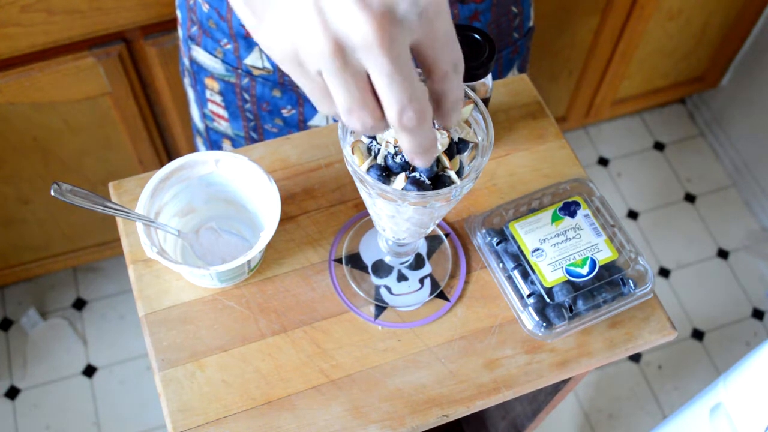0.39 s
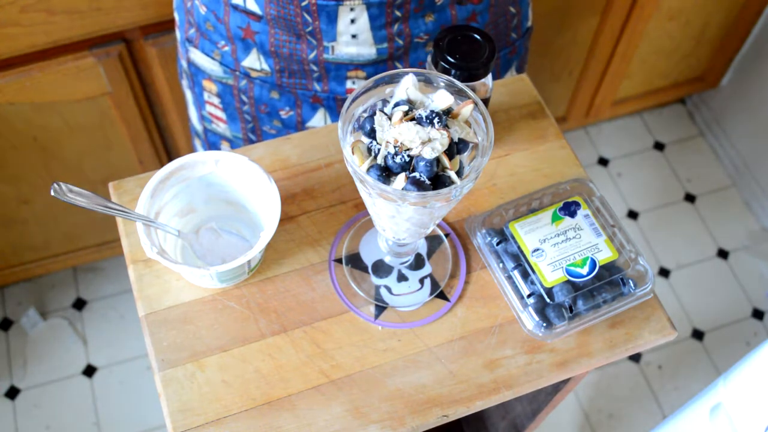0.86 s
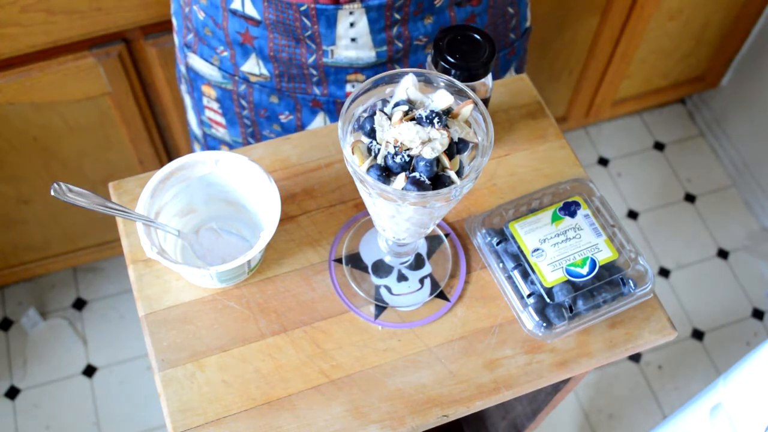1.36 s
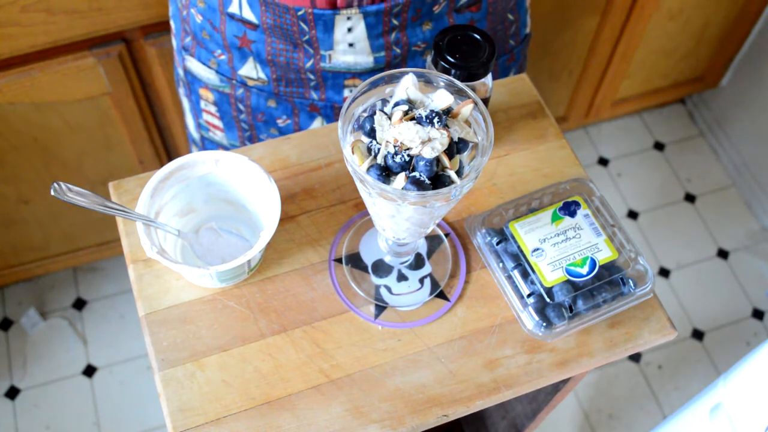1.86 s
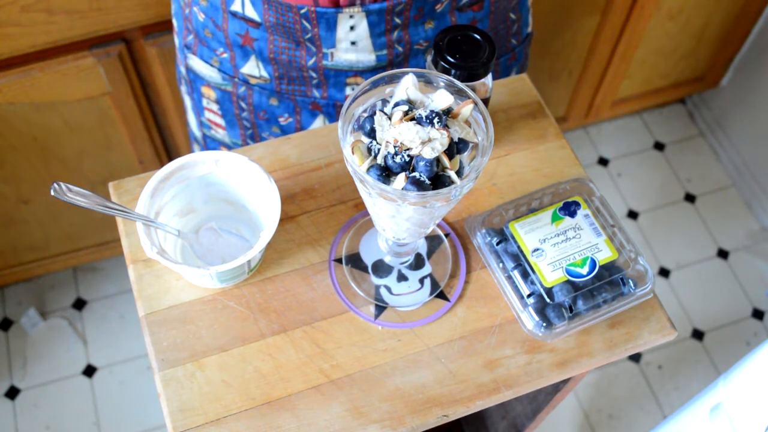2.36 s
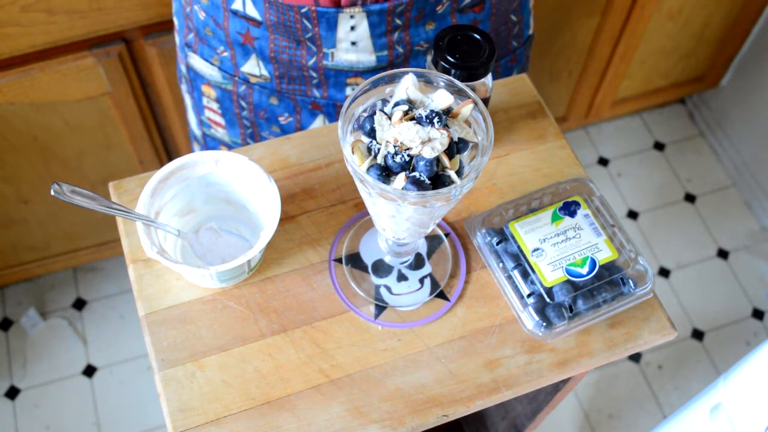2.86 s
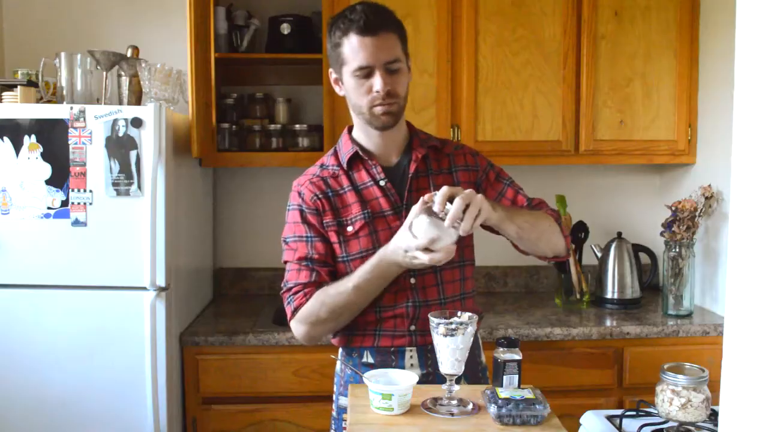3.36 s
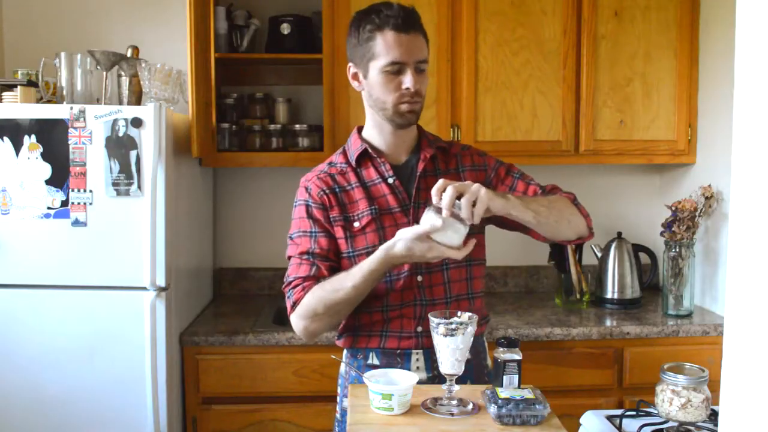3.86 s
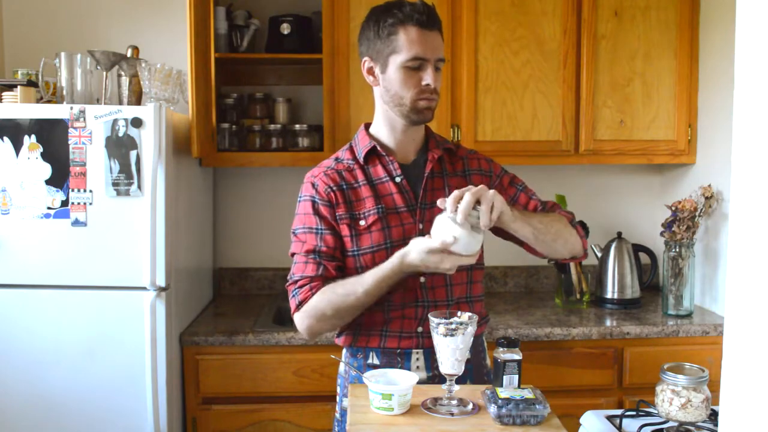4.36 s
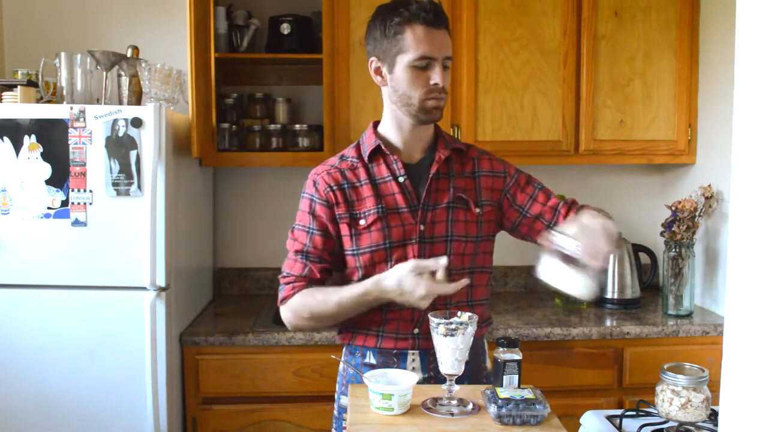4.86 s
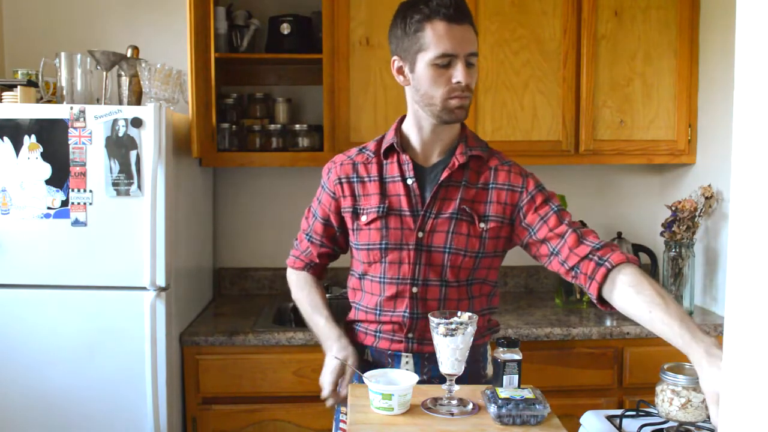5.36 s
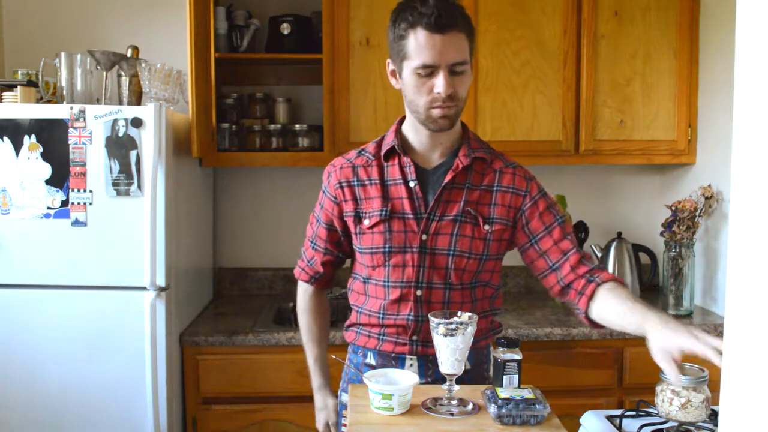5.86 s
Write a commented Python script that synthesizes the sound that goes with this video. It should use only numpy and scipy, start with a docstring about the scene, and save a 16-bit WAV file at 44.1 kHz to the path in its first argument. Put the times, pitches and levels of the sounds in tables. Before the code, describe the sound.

Small ceramic pot handled in a lively kitchen; clicks, knocks, one very loud lid clack, gritty rubbing, a hand brush, and a clank onto metal.

```python
"""Small ceramic pot handled in a kitchen.

A cap snaps, then clicks and scrapes; a glass clinks, the lid knocks, grinds and taps on the pot,
a hand brushes over it with a squeak, and it is set down on a metal top.
Blows are noise bursts plus decaying modes; rubbing is shaped noise and soft tones.
Hard walls answer, a refrigerator hums; the loudest blows clip the recorder.
"""
import sys
import numpy as np
from scipy import signal
from scipy.fft import rfft, irfft, next_fast_len
from scipy.io import wavfile
from scipy.ndimage import map_coordinates

SR = 44100
rng = np.random.default_rng(int(sys.argv[2]) if len(sys.argv) > 2 else 0)


def boost(x):
    """Linear amplitude factor 10**(x/20) for a level x in decibels (scalar or array-like)."""
    u = np.asarray(x, float) / 20
    return 10 ** u


def int16_out(signal):
    """Quantize to a 16-bit WAV file."""
    q = np.round(np.clip(np.atleast_2d(signal).T, -1, 1) * 32767)
    wavfile.write(sys.argv[1], SR, q.astype(np.int16))


N = 263529  # samples

# cap snap, then small clicks and a short scrape: start_s, level_db, centre_hz, thud_db, treble_db
# (thud and treble relative to the centre band, here and below)
CAP_CONTACTS = [(1.5918, -13.5, 1300, 0, -16), (1.5944, 1.5, 3600, -13, -12),
                (1.657, -29.5, 3600, -20, -12), (1.7094, -32.5, 5000, -12, -31), (1.946, -20, 2700, -6, -2),
                (1.956, -23.5, 1700, 0, -10), (1.9765, -26, 3600, -4.5, -17)]
# glass clink: start_s, level_db, centre_hz, thud_db, treble_db
GLASS_HITS = [(1.7607, -13.5, 3520, -3.5, -11.5)]
# knocks: start_s, level_db, centre_hz, thud_db, treble_db
BOARD_HITS = [(1.977, -16, 300, -6, -33), (2.011, -27.5, 385, -14, -24), (2.051, -18, 1050, -17, -26),
              (2.182, -23.5, 1150, 0, -28), (2.318, -23, 860, 3, -12), (2.465, -39, 280, 0, -30),
              (2.605, -32, 280, 0, -30), (2.669, -30, 900, 3, -26), (2.838, -20, 1300, -13.5, -20),
              (2.9365, -5.5, 400, -8, -19)]
# lid on pot: start_s, level_db, centre_hz, thud_db, treble_db, ring_db (how freely the pot rings)
LID_HITS = [(2.305, -28, 3000, -19, -2, -9), (2.533, -37, 1900, 7, -10, -10),
            (2.599, -34, 2030, 8, -22, -13), (2.638, -38, 6100, 3, -14, -2),
            (2.7245, -23.5, 3600, 5, -12, -10), (2.755, -33, 2200, -5, -15, -10),
            (2.808, -23, 2800, -12, -5, -16), (2.838, -31, 2000, 6, -11, -8.5),
            (2.939, -1.5, 1980, -20, -5, -11.5), (3.024, -25.5, 2020, -23, -1.5, -6),
            (3.19, -33.5, 2500, -7, -13.5, -8.5), (3.5245, -19, 2420, -13, -2.5, .8),
            (3.8, -33, 2350, -25, -12, -8), (4.122, -53.5, 4500, -14, -1.2, -3)]
# grit catching under the lid: start_s, level_db, centre_hz, thud_db, treble_db
GRIT_CATCHES = [(2.638, -40, 2400, -40, -30), (3.717, -44, 5500, -40, -30), (3.745, -37, 2300, -40, -30),
                (3.772, -42, 5000, -40, -20), (3.795, -43, 3500, -40, -30), (3.821, -35, 4950, -40, -25),
                (3.862, -42, 2400, -40, -30)]
# pot on metal top: start_s, level_db, centre_hz, thud_db, treble_db
METAL_HITS = [(5.379, -14, 1950, -8, -11), (5.398, -20, 800, -18.5, -26), (5.49, -25, 1000, -7, -41),
              (5.555, -33, 196, 3, -35)]
# modes of each object: mode_hz, level_db, t60_s
CAP_MODES = [(644, 1, 0.035), (1000, -2.2, 0.022), (2010, -5, 0.015), (2900, -3, 0.008), (3200, 1.5, 0.01),
             (3370, -5, .015), (3780, -8, 0.01), (4480, 1.5, 0.01), (4650, 1.5, 0.014), (6560, -3, .008),
             (8560, -8, 0.0053)]
GLASS_MODES = [(494, 3.5, 0.063), (605, 3, 0.041), (2320, 0.5, 0.085), (3250, -2, .03), (3600, -2, 0.036),
               (4312, 0, 0.075), (5184, -2, .08), (5805, 1.5, 0.075), (6455, 0, .07), (8619, -0.7, 0.11),
               (11140, -6.5, 0.18), (11930, -1.5, 0.066), (12960, 0, .08)]
BOARD_MODES = [(248, -6.5, 0.02), (268.5, 2, .08), (398.6, -3, .06), (463, .5, .07), (900, -5, 0.035),
               (1190, -2, .015), (1460, -11.5, .02)]
POT_MODES = [(269.8, 1, 0.13), (390.6, -8, 0.068), (456, -12, 0.23), (558, -8, 0.13), (1150, -11, 0.024),
             (1506, -10.5, 0.07), (1865, -12, 0.033), (1985, -1.5, 0.075), (2015, -5, 0.11),
             (2240, -5.5, 0.07), (2400, -10, .12), (3200, -18, .03), (3500, -19.5, .1), (3915, -7, 0.06),
             (4080, -14, .1), (4650, -14.5, .05), (5000, -14, .1), (6060, -16.5, .04), (6330, -16, 0.055)]
METAL_MODES = [(387.8, -6, 0.3), (790, .5, 0.14), (581, -8, .2), (915, -9, .15), (1000, -8, .18),
               (1064, -8.5, .18), (1168, -5, .15), (1335, -5, .2), (1486, -6, 0.2), (1658, -6, .12),
               (1830, -3, .12), (1925, 2.5, 0.1), (1970, 5, 0.14), (2126, 3, 0.09), (2557, -6, 0.12),
               (2891, -6.5, 0.26), (3900, -8, 0.13), (4300, -6, 0.18), (4420, -2, .07), (5530, -7, .2),
               (5750, -4, .08), (6476, 8, .04), (7430, 2, 0.16), (8160, -11, .08), (9600, 4, 0.06),
               (11970, 3, .04)]
# rubbing on the pot, lid scrapes then squeak under the hand:
# peak_s, ring_db, rise_s, hiss_db, rumble_db (last two over the ring)
POT_RUBS = [(2.322, -42.5, .022, 1.5, -1.5), (2.542, -51, .009, -2, -3), (2.63, -53, .08, -6, -3),
            (2.725, -48, .03, -4.5, -2), (2.87, -46.5, .13, -13, 5), (3.17, -51, .08, 1.2, -4),
            (3.28, -49, .045, 1.5, -3.5), (3.516, -44, .08, -5, 1.2), (3.535, -35, .01, -8.5, 0),
            (3.814, -44, .13, -5, -6), (4.285, -46, .02, -1.2, -12), (4.42, -53, .1, 3, -6)]
# hiss spectrum of the rubbing: freq_hz, density_db_per_hz
GRIT_SPECTRUM = [(1760, -33), (3000, -12.5), (3520, -3), (3820, -6.5), (5030, 0.5), (9100, -12.5),
                 (15600, -29.5)]
# hand over the glaze, one stroke: peak_s, level_db, rise_s, hold_s, fade_db_per_s
HAND_STROKE = (4.32, -27.5, .057, .032, 215)
# skin hiss spectrum: freq_hz, density_db_per_hz
SKIN_SPECTRUM = [(180, -61), (300, -26), (372, -12), (446, -1), (621, -29), (1140, -22), (2180, -6.5),
                 (4290, -5.5), (6070, 0.5), (11200, -8), (15600, -18)]
# faint rustles: peak_s, level_db, rise_s, hold_s, fade_db_per_s
RUSTLES = [(0.01, -64, .01, .45, 60), (1.138, -64, .06, .03, 200), (1.29, -70, .05, .03, 200),
           (1.402, -67, .04, .01, 120)]
# rustle spectrum: freq_hz, density_db_per_hz
RUSTLE_SPECTRUM = [(900, -30), (1400, -2), (2000, -8.5), (3000, -1), (4200, -8.5), (7000, -13),
                   (12000, -30.5)]
# soft gliding tones: start_s, length_s, from_hz, to_hz, level_db
GLIDES = [(3.15, .34, 470, 515, -51), (4.265, .045, 2400, 2350, -42), (4.385, .08, 1880, 1950, -47.5)]
# wall reverberation: freq_hz, t60_s
WALL_DECAY = [(200, 0.39), (1000, 0.53), (3000, 0.43), (8000, 0.34), (15000, .22)]
# steady motor tones: pitch_hz, level_db, waver_db
HUM_TONES = [(59.2, -39.5, -1), (121, -55, 2.5), (272.5, -70.5, 0), (340, -67, 2), (800, -68.5, 4.2)]
# low tone that swells and wanders: time_s, level_db, pitch_hz
LOW_TONE = [(0.0, -62, 106.9), (0.43, -41, 95.6), (0.65, -51, 94.8), (1.01, -41, 94.8), (1.11, -49, 95.7),
            (1.91, -41, 98.9), (2.1, -46, 97.5), (2.34, -39, 97.4), (3.48, -45, 98.0), (3.65, -59, 94.8),
            (3.99, -47, 104.1), (4.33, -49, 98.7), (4.56, -58, 106.9), (4.68, -46, 105.6),
            (5.19, -50, 105.9), (5.39, -46, 96.6), (5.71, -48, 95.5), (5.98, -52, 106.9)]
# background levels: time_s, drone_db, hiss_db
BACKGROUND = [(0.0, -39.5, -58.5), (0.35, -39.5, -60.5), (0.8, -45, -64.5), (1.3, -46.5, -62),
              (5.3, -45.5, -62.5), (5.97, -42.5, -59.5)]
# background spectra: freq_hz, density_db_per_hz
DRONE_SPECTRUM = [(12, -43.5), (20, -2), (32, -15), (43, -8), (65, -14), (104, -16.5), (146, -22.5),
                  (270, -21.5), (312, -29), (416, -28), (498, -33), (783, -35.5), (1500, -44),
                  (1950, -76.5), (3300, -120)]
HISS_SPECTRUM = [(400, -30), (800, -10), (1300, -18.5), (2000, -11), (3200, -16.5), (6000, -19),
                 (10000, -22), (15600, -25)]


def unit(x):
    """x at rms 1."""
    return x / np.sqrt(np.mean(x ** 2) + 1e-20)


def along(points, hz):
    """Interpolates (freq_hz, value) points on a log axis."""
    f, v = np.transpose(points)
    return np.interp(np.log(hz + 1), np.log(f + 1), v)


def curves(rows):
    """One value per sample for each column after the time."""
    time_s, *columns = np.transpose(rows)
    return [np.interp(np.arange(N) / SR, time_s, column) for column in columns]


def wobble(rate_hz):
    """Smooth random curve with rate_hz knots a second."""
    knots = rng.standard_normal(int(N * rate_hz / SR) + 4)
    return map_coordinates(knots, [np.arange(N) * rate_hz / SR])


def filtered(x, response):
    """x through a (complex) response of frequency."""
    size = next_fast_len(len(x) + 8192)
    return irfft(rfft(x, size) * response(np.fft.rfftfreq(size, 1 / SR)), size)[:len(x)]


def noise(spectrum, grain_db=0):
    """Coloured noise of rms 1; grain_db of fast level wobble makes it scratchy."""
    grainy = rng.standard_normal(N) * boost(grain_db * wobble(300))
    return unit(filtered(grainy, lambda hz: boost(along(spectrum, hz))))


def swell(peak_s, level_db, rise_s, hold_s, fade_db_per_s):
    """Envelope of a stroke: grows, holds, fades."""
    late_s = np.arange(N) / SR - peak_s
    growth = np.clip(1 + late_s / rise_s, 0, 1) ** 1.5
    return growth * boost(level_db - fade_db_per_s * np.clip(late_s - hold_s, 0, None))


def bump(hz, centre_hz, width_octaves):
    """Gaussian band on an octave axis."""
    return np.exp(-(np.log2((hz + 1) / centre_hz) / width_octaves) ** 2 / 2)


def room(x):
    """Wall answer: fresh noise tail in which each frequency dies at its own speed."""
    hz, t, z = signal.stft(rng.standard_normal(SR * 3 // 4), SR, nperseg=256)
    decay = boost(-60 * t / along(WALL_DECAY, hz)[:, None])
    tail = signal.istft(z * decay, SR, nperseg=256)[1]
    tail *= 1 - np.exp(-np.arange(len(tail)) / SR / 0.0013)  # echoes thicken over the first moments
    return signal.fftconvolve(x, tail / np.linalg.norm(tail))


def strikes(contacts, modes, ring_db, crack_db, treble_hz, crack_fade_s, rise_s, octaves, wet_db, flutter_db):
    """Contacts: noise burst plus object modes, both coloured by how it landed, then the room."""
    out, t = np.zeros(N + 2 * SR), np.arange(SR // 3) / SR
    for start_s, level_db, centre_hz, thud_db, treble_db, *own_ring_db in contacts:
        def colour(hz):
            bands = bump(hz, centre_hz, octaves) + boost(thud_db) * bump(hz, 380, 1.0)
            bands = bands + boost(treble_db) * bump(hz, treble_hz, 1.0)
            return bands / (1 + (hz / 14800) ** 6)

        fade = boost(-60 * t / crack_fade_s)
        burst = rfft(rng.standard_normal(len(t)) * fade)
        even_burst = irfft(burst / np.abs(burst) ** .7, len(t))  # flattens chance spectral peaks
        crack = filtered(even_burst, colour) * np.sqrt(fade)
        crack *= np.linalg.norm(fade) / np.linalg.norm(crack)

        # loose contact makes each mode flutter
        knots = rng.standard_normal((len(modes), 64))
        places = np.mgrid[:len(modes), :len(t)] * [[[1]], [[120 / SR]]]  # 120 knots a second
        flutter = map_coordinates(knots, places, order=1)
        ring = np.zeros(len(t))
        for (mode_hz, mode_db, t60_s), shake in zip(modes, flutter):
            # modes nearest the centre are hit hardest
            drive = colour(mode_hz) * (1 + boost(1.5) * bump(mode_hz, centre_hz, 0.05))
            shake_db = flutter_db * shake * np.tanh(t / .02)
            ring += drive * boost(mode_db + shake_db - 60 * t / t60_s) * np.sin(2 * np.pi * mode_hz * t)

        blow = boost(crack_db) * crack + boost(ring_db + sum(own_ring_db)) * ring
        blow *= boost(level_db) * (1 - np.exp(-t / rise_s))
        answer = boost(wet_db) * room(blow)
        first = round(start_s * SR)
        out[first:][:len(t)] += blow
        out[first:][:len(answer)] += answer
    return out[:N]


def cap_snap():
    """Cap snaps, then small clicks and a short scrape: bursts over very short modes."""
    return strikes(CAP_CONTACTS, CAP_MODES, ring_db=-10.5, crack_db=-1.5, treble_hz=11500, crack_fade_s=0.012,
                   rise_s=0.00029, octaves=0.5, wet_db=0.3, flutter_db=0.5)


def lid_taps():
    """Lid taps the pot, whose modes ring as freely as each contact lets them."""
    return strikes(LID_HITS, POT_MODES, ring_db=0, crack_db=-.3, treble_hz=6500, crack_fade_s=0.016,
                   rise_s=0.0004, octaves=0.8, wet_db=-1.1, flutter_db=1.0)


def knocks():
    """Knocks: dull bursts over short, low board modes."""
    return strikes(BOARD_HITS, BOARD_MODES, ring_db=-11, crack_db=-.5, treble_hz=6000, crack_fade_s=0.016,
                   rise_s=0.0011, octaves=0.5, wet_db=-5, flutter_db=3.3)


def glass_clink():
    """Glass clinks: wide-band burst over high modes."""
    return strikes(GLASS_HITS, GLASS_MODES, ring_db=-16, crack_db=.5, treble_hz=9000, crack_fade_s=0.013,
                   rise_s=0.00053, octaves=1.0, wet_db=1.8, flutter_db=3.5)


def set_down():
    """Pot lands on the metal top: wide-band bursts over dense, long modes."""
    return strikes(METAL_HITS, METAL_MODES, ring_db=-13.5, crack_db=-.5, treble_hz=7300, crack_fade_s=0.064,
                   rise_s=0.00087, octaves=1.5, wet_db=4.0, flutter_db=3.5)


def grit_chirps():
    """Grit catches under the lid and chirps in a narrow band."""
    return strikes(GRIT_CATCHES, POT_MODES, ring_db=-15, crack_db=0, treble_hz=6000, crack_fade_s=0.07,
                   rise_s=0.003, octaves=0.07, wet_db=-2, flutter_db=1.5)


def pot_body(hz, low_hz, high_hz):
    """Sum of resonances at the pot modes between two limits."""
    total = 0
    for mode_hz, mode_db, t60_s in POT_MODES:
        if low_hz < mode_hz < high_hz:
            damping = 1j * hz * 14 / t60_s  # broader than free ringing
            total = total + boost(mode_db) * damping / (mode_hz * mode_hz - hz * hz + damping)
    return total


def pot_rubbing():
    """Lid scrapes, then the pot squeaks under the hand: rubbing hisses and keeps the pot's modes sounding."""
    scrape = rng.standard_normal(N) * boost(1.3 * wobble(130))
    ring = unit(filtered(scrape, lambda hz: pot_body(hz, 1000, 3000)))
    rumble = unit(filtered(scrape, lambda hz: pot_body(hz, 1, 1000)))
    hiss = noise(GRIT_SPECTRUM, grain_db=4.5)
    out = np.zeros(N)
    for peak_s, level_db, rise_s, hiss_db, rumble_db in POT_RUBS:
        mix = ring + boost(hiss_db) * hiss + boost(rumble_db) * rumble
        out += swell(peak_s, level_db, rise_s, hold_s=0, fade_db_per_s=150) * mix
    return out


def brush():
    """Skin slides over the glaze: a smooth bright hiss."""
    return swell(*HAND_STROKE) * noise(SKIN_SPECTRUM, grain_db=1.0)


def hoot():
    """Soft, unsteady tones that glide with the rubbing."""
    out = np.zeros(N)
    for start_s, length_s, from_hz, to_hz, level_db in GLIDES:
        progress = np.clip((np.arange(N) / SR - start_s) / length_s, 0, 1)
        cycles = np.cumsum(from_hz + (to_hz - from_hz) * progress) / SR
        level = np.sin(np.pi * progress) * boost(level_db + 2.5 * wobble(25))
        out += level * np.sin(2 * np.pi * cycles)
    return out


def rustling():
    """Faint rustles: short swells of scratchy noise."""
    return sum(swell(*row) for row in RUSTLES) * noise(RUSTLE_SPECTRUM, grain_db=2.2)


def motor_tone(cycles, level_db, drift_cycles):
    """Sine at an rms level, its phase drifting at random."""
    phase = cycles + drift_cycles * wobble(2.7)
    return np.sqrt(2) * boost(level_db) * np.sin(2 * np.pi * phase)


def fridge():
    """Refrigerator: wavering motor tones, one of which swells and wanders."""
    t = np.arange(N) / SR
    low_db, low_hz = curves(LOW_TONE)
    out = motor_tone(np.cumsum(low_hz) / SR, low_db + 1.5 * wobble(6), .1)
    for pitch_hz, level_db, waver_db in HUM_TONES:
        out += motor_tone(pitch_hz * t, level_db + waver_db * wobble(5), .06)
    return out


def room_air():
    """Background of the room: unsteady low drone plus hiss."""
    drone_db, hiss_db = curves(BACKGROUND)
    drone = boost(drone_db + 1.1 * wobble(8.7)) * noise(DRONE_SPECTRUM)
    return drone + boost(hiss_db) * noise(HISS_SPECTRUM)


def scene():
    """Contacts and rubbing in the room, over the background; one channel."""
    hits = cap_snap() + lid_taps() + knocks() + glass_clink() + set_down() + grit_chirps()
    rubbing = pot_rubbing() + brush() + hoot() + rustling()
    rubbing_answer = boost(-7.5) * room(rubbing)[:N]
    return (hits + rubbing + rubbing_answer + fridge() + room_air())[None]


def top_cut(x):
    """Nothing passes above the cut-off."""
    return signal.sosfilt(signal.butter(12, 15720, fs=SR, output="sos"), x)


def record(dry):
    """Recorder: nothing above its band limit, clipping at full scale."""
    limited = filtered(dry[0], lambda hz: hz < 15750)
    mix = np.clip(limited, -1, 1)[None]
    return top_cut(mix)


dry = scene()
out = record(dry)
int16_out(out)
```